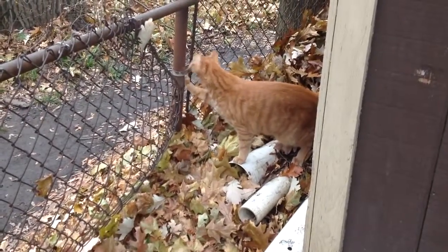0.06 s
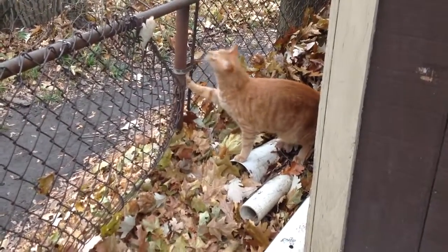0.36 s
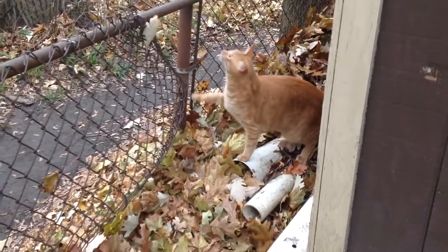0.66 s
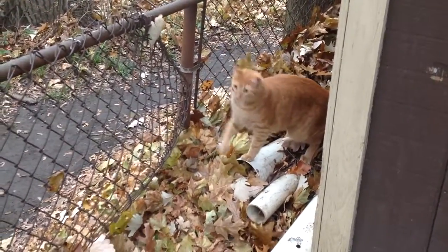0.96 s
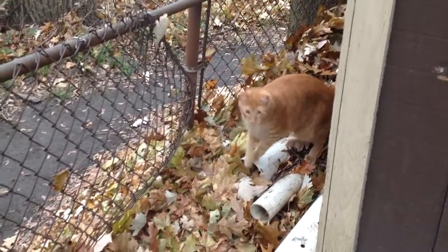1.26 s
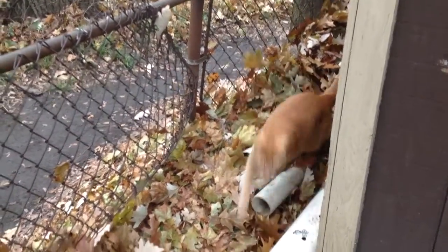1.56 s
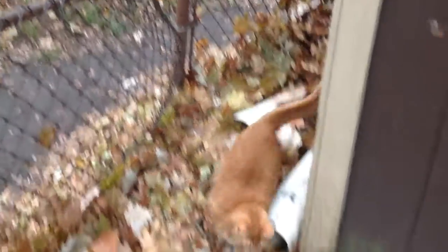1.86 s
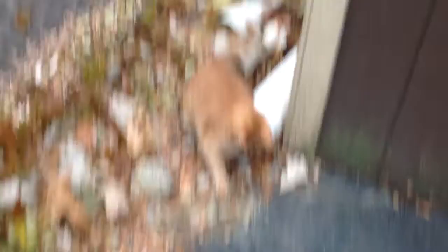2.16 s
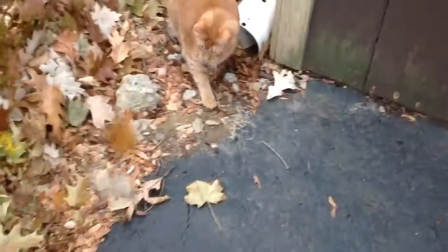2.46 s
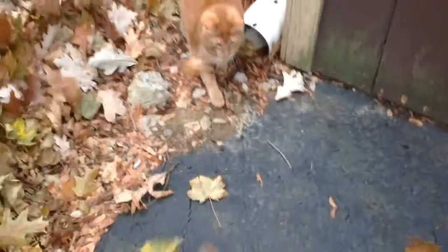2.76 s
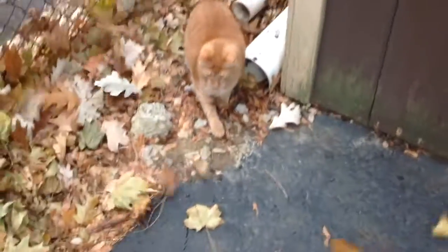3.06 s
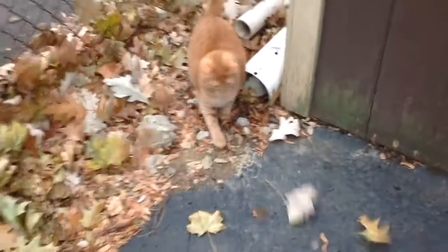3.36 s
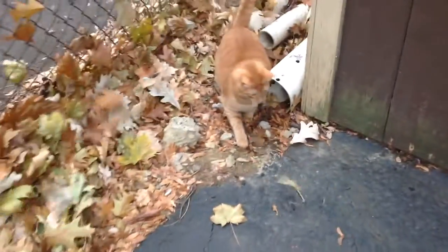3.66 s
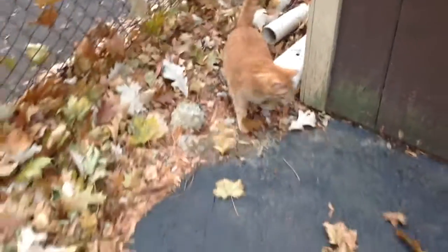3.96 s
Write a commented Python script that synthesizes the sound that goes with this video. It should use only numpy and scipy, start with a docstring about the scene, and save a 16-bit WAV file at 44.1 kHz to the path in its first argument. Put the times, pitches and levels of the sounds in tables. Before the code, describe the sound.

Gusty wind thumps on the microphone while dry leaves rustle and crunch under a cat's paws.

```python
"""Gusty autumn wind thumps on a small microphone in a yard; the harder an eddy hits, the brighter it is.
Dry leaves skitter over the ground in a swelling rustle of tiny contacts, and single ones snap.
A cat's paws crunch through the litter. A wall scatters the leaf sounds; far trees rush steadily.
The recorder's limiter holds down the hardest buffets."""
import sys
import numpy as np
from scipy import signal
from scipy.fft import rfft, irfft, next_fast_len
from scipy.io import wavfile
from scipy.ndimage import uniform_filter1d, minimum_filter1d, map_coordinates

SR = 44100
rng = np.random.default_rng(int(sys.argv[2]) if len(sys.argv) > 2 else 0)


def inscribe(sig):
    """Save sig as 16-bit PCM at rate SR to the path in sys.argv[1].

    A 1-D sig is mono; a 2-D sig holds one channel per row.
    Samples are clipped to [-1, 1] before scaling.
    """
    pcm = np.round(np.clip(np.atleast_2d(sig).T, -1, 1) * 32767)
    wavfile.write(sys.argv[1], SR, pcm.astype(np.int16))


N = 176400

# dry-leaf spectrum: freq_hz, gain_db
LEAF_SPECTRUM = [(300, -43), (900, -11), (1700, -4.5), (2300, -8), (3100, 1), (4100, 0.85), (5300, -6),
                 (6600, -2.5), (8000, -8), (12000, -11.5), (15500, -14)]
SPLIT_HZ = 5300  # big leaves crackle below, small flakes above
TOP_HZ = 15400


def amp(db):
    """Decibels to gain."""
    return 10 ** (np.asarray(db) / 20)


def unit(x):
    """Scale to rms 1."""
    return x / np.sqrt(np.mean(x ** 2) + 1e-20)


def evened(x, span_s):
    """Divide x by its running rms."""
    power = uniform_filter1d(x ** 2, int(span_s * SR))
    return x / np.sqrt(np.abs(power) + 1e-6)


def clock():
    """Sample times in seconds."""
    return np.arange(N) / SR


def curve(rows):
    """Interpolate (time_s, value) rows to every sample."""
    return np.interp(clock(), *np.transpose(rows))


def wobble(knots_per_s):
    """Smooth random curve."""
    return map_coordinates(rng.standard_normal(4096), [clock() * knots_per_s], mode="wrap")


def filtered(x, response):
    """Apply the gain response(hz) to x."""
    size = next_fast_len(len(x) + 8192)
    hz = np.fft.rfftfreq(size, 1 / SR)
    return irfft(rfft(x, size) * response(hz), size)[:len(x)]


def coloured(x, spectrum):
    """Shape x by (freq_hz, gain_db) rows; rms 1."""
    freq_hz, gain_db = np.transpose(spectrum)
    return unit(filtered(x, lambda hz: amp(np.interp(np.log(hz + 1), np.log(freq_hz), gain_db))))


def noise(spectrum):
    """Coloured noise; rms 1."""
    return coloured(rng.standard_normal(N), spectrum)


def band(x, centre_hz, width_oct):
    """Bell-shaped band of x; rms 1."""
    return unit(filtered(x, lambda hz: np.exp(-.5 * (np.log2((hz + 1) / centre_hz) / width_oct) ** 2)))


def trees():
    """Wind rushes evenly through far trees."""
    # foliage spectrum: freq_hz, gain_db
    spectrum = [(25, -72), (60, -16.5), (120, -2.5), (270, 4.5), (400, -4), (700, -7), (1000, -6.5),
                (1350, -8), (1680, -5.5), (2100, -13.5), (3100, -7), (4000, -12), (5000, -18),
                (6600, -18.5), (9000, -23.5), (12000, -37), (15500, -40)]
    # strength of the rush: time_s, level_db
    levels = [(0, -33.5), (.6, -35), (1.3, -33.5), (2.5, -33), (4, -36)]
    return amp(curve(levels) + .41 * wobble(7)) * noise(spectrum)


def crackles(contacts_per_s=5200, low_hz=1035, spread_db=4, range_db=13, ring_cycles=3.2):
    """Tiny contacts of dry leaves, each a few cycles long, most weak and a few strong."""
    when, pitch, strength = rng.random((int(contacts_per_s * N / SR), 3)).T
    offsets = np.arange(128)
    pitch_hz = (low_hz + (TOP_HZ - low_hz) * pitch)[:, None]
    gain = amp(np.minimum(-spread_db * np.log(strength), range_db))[:, None]
    cycles = pitch_hz * offsets / SR
    grains = gain * np.sqrt(pitch_hz) * np.sin(2 * np.pi * cycles) * np.exp(-2 * cycles / ring_cycles)
    samples = (when * N).astype(int)[:, None] + offsets
    contacts = np.bincount(samples.ravel(), grains.ravel(), N)[:N]
    return coloured(unit(contacts), LEAF_SPECTRUM)


def scrape_gain(landings_per_s=110, decay_s=.004, bed=.45):
    """Leaves land and skid at random: each jump in power dies quickly to a steady bed."""
    when, size = rng.random((int(landings_per_s * N / SR), 2)).T
    landings = np.bincount((when * N).astype(int), size ** 2, N)
    pole = np.exp(-1 / (decay_s * SR))
    skid_power = signal.lfilter([2], [1, -pole], landings)
    return unit(np.sqrt(bed ** 2 + skid_power))


def patchy(x, depth_db=1.2):
    """The colour of x shifts as different leaves take turns."""
    spectra = signal.stft(x, nperseg=256)[2]
    patches = uniform_filter1d(rng.standard_normal(spectra.shape), size=6, axis=0)
    patches = unit(uniform_filter1d(patches, size=12, axis=1))
    return unit(signal.istft(spectra * amp(depth_db * patches), nperseg=256)[1][:N])


def rustle(flurry_db=1.1, crackle_db=-2.5, hiss_db=-4.5):
    """Near leaves, big and small, crackle in flurries over the hiss of many farther ones."""
    # swell of the blown leaves: time_s, level_db
    swell = [(0, -45), (.09, -42.5), (.25, -41), (.45, -45.5), (.88, -47.5), (1.1, -41), (1.3, -42),
             (1.5, -35.5), (1.72, -34), (1.93, -32), (2.08, -32.5), (2.25, -31), (2.44, -27.5),
             (2.8, -26.5), (3.05, -28.5), (3.35, -34), (3.52, -30.5), (4, -35)]
    grains = crackles()
    big = filtered(grains, lambda hz: 1 / (1 + (hz / SPLIT_HZ) ** 6))
    small = grains - big
    flurries = sum(amp(flurry_db * wobble(60)) * leaves for leaves in (big, small))
    far = amp(hiss_db) * noise(LEAF_SPECTRUM)
    near = amp(crackle_db) * scrape_gain() * patchy(flurries)
    return amp(curve(swell)) * (near + far)


def crunches():
    """A paw or a tumbling leaf sets off a short clump of crackles."""
    # crunches in the litter: peak_s, rise_s, decay_s, level_db, centre_hz
    clumps = [(.08, 0.02, 0.0085, -37, 5900), (0.241, 0.0055, 0.017, -35, 5970),
              (.924, 0.0073, 0.02, -34, 8000), (0.964, 0.0035, 0.0062, -36.5, 7000),
              (1.39, 0.012, 0.015, -31, 7040), (1.419, 0.005, 0.011, -38, 3160),
              (1.603, 0.0015, 0.014, -21.5, 2740), (1.621, .004, 0.0027, -25, 3140),
              (1.67, 0.0093, 0.012, -31.5, 6260), (1.787, 0.076, 0.028, -32, 1900),
              (1.817, 0.021, 0.035, -25, 5840), (2.152, 0.026, 0.014, -25, 3220),
              (2.324, 0.0026, 0.0043, -22.5, 3770), (2.388, 0.0061, .012, -24, 3500),
              (2.42, 0.0071, 0.044, -25, 6500), (2.518, 0.0081, 0.016, -21.5, 6000),
              (2.56, 0.019, 0.013, -24, 2780), (2.684, 0.031, 0.011, -20, 5300),
              (2.722, .008, 0.014, -22, 4500), (2.776, 0.004, 0.018, -23, 5500),
              (2.812, 0.011, 0.011, -23.5, 5500), (2.884, 0.0065, 0.017, -19.5, 4120),
              (2.983, .006, 0.0044, -23, 4000), (3.035, 0.0064, 0.0085, -23.5, 4470),
              (3.068, 0.006, 0.015, -22.5, 4300), (3.169, 0.003, 0.006, -27, 4020),
              (3.195, 0.0031, 0.0042, -20.5, 4500), (3.585, 0.0024, .004, -25, 3650),
              (3.84, 0.014, 0.025, -31, 7040)]
    t, out = clock(), np.zeros(N)
    grains = scrape_gain() * crackles()
    for peak_s, rise_s, decay_s, level_db, centre_hz in clumps:
        envelope = np.exp(-np.where(t < peak_s, (peak_s - t) / rise_s, (t - peak_s) / decay_s))
        width_oct = .85 * (centre_hz / SPLIT_HZ) ** .55  # small flakes sound broader than big leaves
        out += amp(level_db) * envelope * evened(band(grains, centre_hz, width_oct), span_s=.012)
    return out


def leaf_snaps(decay_s=.0019, width_oct=.8, size=2048):
    """One stiff leaf cracks, then rings for a few milliseconds."""
    # single leaves that tap or snap: start_s, peak_db, pitch_hz
    snaps = [(0.026, -17.5, 2180), (.113, -16.5, 2560), (0.75, -20, 2340), (1.388, -19, 3600),
             (1.417, -20, 3100), (1.462, -21, 9700), (1.567, -21, 2930), (1.604, -16, 3120),
             (1.7953, -16, 5750), (1.814, -13.5, 1900), (1.8143, -21, 4500), (2.142, -15, 3500),
             (2.149, -7, 3350), (2.159, -13, 3200), (2.459, -14, 8500), (2.519, -12, 6200),
             (2.556, -8, 4520), (2.81, -22, 5000), (2.882, -16, 3570), (3.168, -12.5, 4070),
             (3.585, -16, 3500), (3.666, -20, 3940), (3.907, -14.5, 5700)]
    t, out = np.arange(size) / SR, np.zeros(N + size)
    crack = 5 * (t == 0)
    for start_s, peak_db, pitch_hz in snaps:
        edges_hz = pitch_hz * 2 ** (width_oct * np.array([-.5, .5]))
        strike = crack + np.exp(-t / decay_s) * rng.standard_normal(size)
        ring = signal.lfilter(*signal.butter(2, edges_hz, "band", fs=SR), strike)
        out[round(start_s * SR):][:size] += amp(peak_db) * ring / np.abs(ring).max()
    return out[:N]


def wall_scatter(x, gain_db=-9, decay_s=.0063, size=2048, count=41):
    """Short echoes off wall and ground; their paths crossfade as the leaves move about."""
    out, place = np.zeros(N), np.linspace(0, count - 1, N)
    tails = rng.standard_normal((count, size)) * np.exp(-np.arange(size) / SR / decay_s)
    for k, tail in enumerate(tails):
        active = np.flatnonzero(np.abs(place - k) < 1)
        fade = np.sqrt(1 - np.abs(place[active] - k))
        echo = signal.fftconvolve(x[active] * fade, tail / np.linalg.norm(tail))[:N - active[0]]
        out[active[0]:][:len(echo)] += echo
    return amp(gain_db) * out


def buffets(attack_s=.0043, release_s=.01, hard_eddy_db=-11, hard_flutter_db=-14):
    """Each eddy thumps the microphone; the harder it hits, the more rough flutter rides on it."""
    # eddy hits: start_s, length_s, level_db
    eddies = [(0.12, 0.016, -19), (0.164, 0.0071, -18), (0.297, 0.013, -27), (.321, 0.009, -20.5),
              (0.417, 0.018, -21.5), (0.436, 0.025, -28), (0.479, 0.022, -21.5), (0.733, 0.054, -20.5),
              (0.777, 0.0087, -16.5), (0.811, 0.014, -26), (0.888, 0.016, -28.5), (1.022, 0.013, -29.5),
              (1.05, 0.018, -23), (1.205, 0.04, -21), (1.332, 0.019, -33.5), (1.383, 0.014, -28),
              (1.61, 0.023, -25), (1.686, 0.02, -31.5), (1.9, 0.048, -29.5), (2.685, 0.022, -14),
              (2.709, 0.03, -24.5), (2.76, 0.024, -30), (2.824, 0.018, -27), (2.925, 0.017, -13.5),
              (2.945, 0.026, -22.5), (3.091, 0.022, -14), (3.251, 0.016, -27), (3.34, 0.045, -11.5),
              (3.393, 0.027, -18), (3.597, 0.039, -16.5), (3.669, 0.035, -16), (3.707, 0.039, -22.5),
              (3.778, 0.02, -19), (3.858, 0.019, -19), (3.873, 0.02, -13.5), (3.913, 0.016, -13),
              (3.942, 0.024, -12.5), (3.972, .036, -8.5)]
    # light buffeting between eddies: time_s, level_db
    draught = [(0, -39), (.65, -41), (1.5, -41.5), (2.5, -39), (3.2, -36.5), (3.48, -34), (3.8, -30),
               (4, -29)]
    # low thump: freq_hz, gain_db
    thump_spectrum = [(25, -107), (55, -72.5), (95, -21), (150, -0.5), (220, 3), (330, -1.4), (480, -7.5),
                      (750, -24.5), (1200, -42), (2500, -73), (8000, -100)]
    # brighter flutter: freq_hz, gain_db
    flutter_spectrum = [(100, -34), (300, 0), (480, 3), (750, -2), (1000, -9), (1400, -16), (2000, -26.5),
                        (4000, -36), (12000, -70)]
    t = clock()
    power = amp(curve(draught) + 2.5 * wobble(14)) ** 2
    for start_s, length_s, level_db in eddies:
        rise = np.exp(-(np.minimum(t - start_s, 0) / attack_s) ** 2)
        fall = np.exp(-np.maximum(t - start_s - length_s, 0) / release_s)
        power += (amp(level_db) * rise * fall) ** 2
    force = np.sqrt(power)
    flutter_gain = amp(hard_flutter_db + 4.7 * wobble(170)) * (force / amp(hard_eddy_db)) ** 2.09
    thump = force * evened(noise(thump_spectrum), span_s=.017)
    flutter = flutter_gain * evened(noise(flutter_spectrum), span_s=.017)
    return thump + flutter


def jolts():
    """A tight vortex swings the diaphragm through a cycle or two."""
    # vortex hits: centre_s, level_db, pitch_hz
    vortices = [(0.3286, -15, 413), (0.431, -8.5, 207), (0.483, -18, 262), (0.7742, -10.5, 353),
                (0.782, -2, 272), (1.052, -22, 330), (1.599, -13, 422), (2.692, -6.5, 337),
                (2.9305, -6, 634), (2.935, -14.5, 350), (2.946, -25, 180), (3.099, -8.5, 265),
                (3.6, -11, 316), (3.881, -5, 446), (3.994, -5, 1140)]
    t, out = clock(), np.zeros(N)
    for centre_s, level_db, pitch_hz in vortices:
        cycles = pitch_hz * (t - centre_s)
        out += amp(level_db) * np.sin(2 * np.pi * cycles) * np.exp(-cycles ** 2)
    return out


def scene():
    """Leaves by the wall, far trees and wind on the microphone; mono."""
    leaves = rustle() + crunches() + leaf_snaps()
    return (leaves + wall_scatter(leaves) + trees() + buffets() + jolts())[None]


def record(dry):
    """Fast limiter, then the recorder's bass roll-off and band limit."""
    ceiling, hold_s, low_cut_hz = .71, .001, 67
    span = int(hold_s * SR)
    needed_gain = np.minimum(1, ceiling / (np.abs(dry[0]) + 1e-9))
    held_gain = minimum_filter1d(needed_gain, 2 * span + 1)
    limited = dry[0] * uniform_filter1d(held_gain, span)
    thinned = signal.lfilter(*signal.butter(2, low_cut_hz, "high", fs=SR), limited)
    return filtered(thinned, lambda hz: hz < TOP_HZ)[None]


dry = scene()
out = record(dry)
inscribe(out)
```